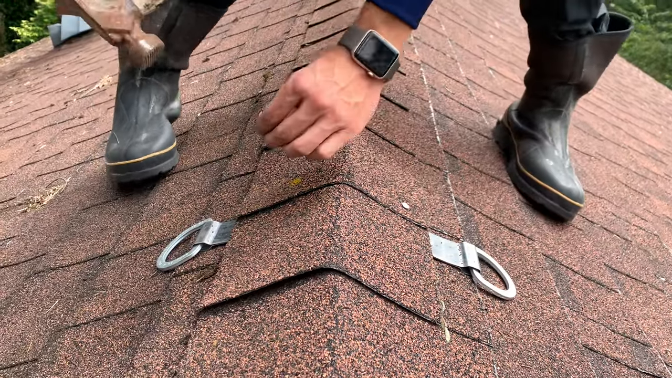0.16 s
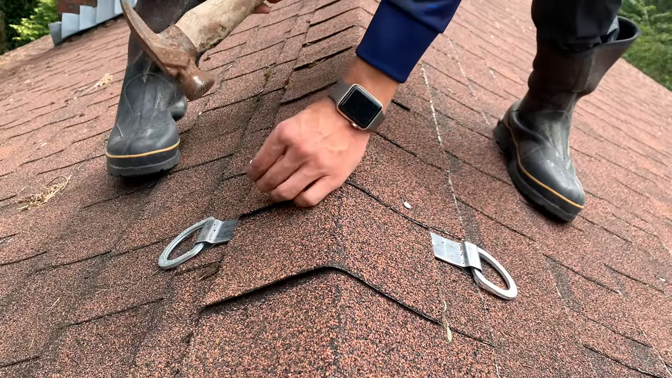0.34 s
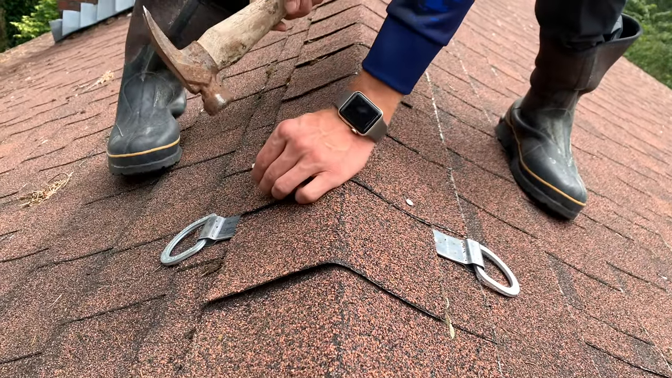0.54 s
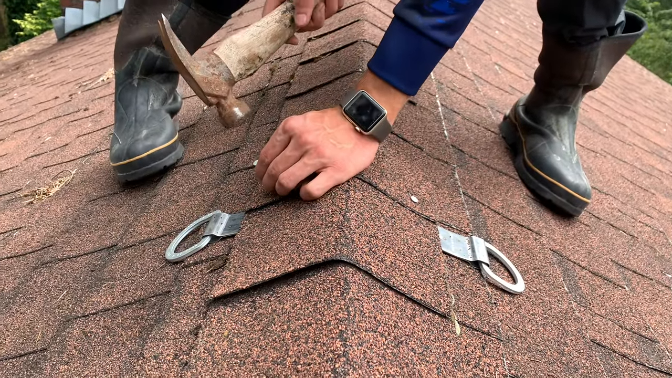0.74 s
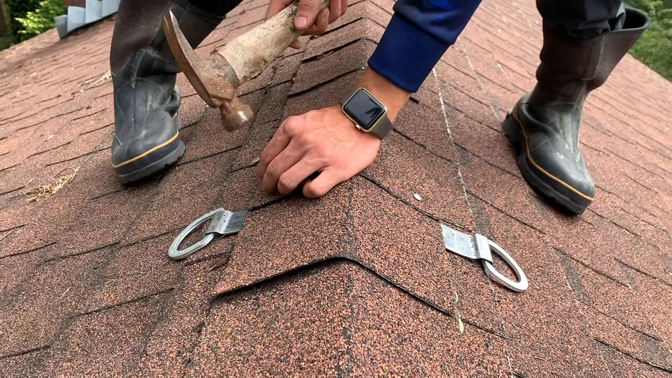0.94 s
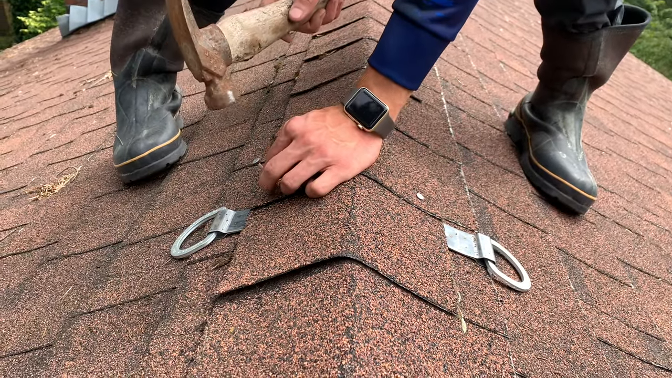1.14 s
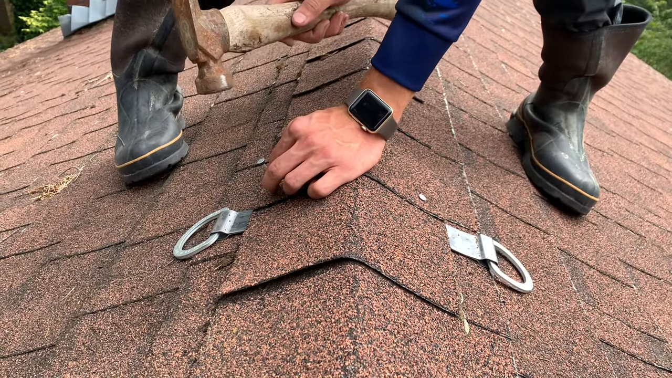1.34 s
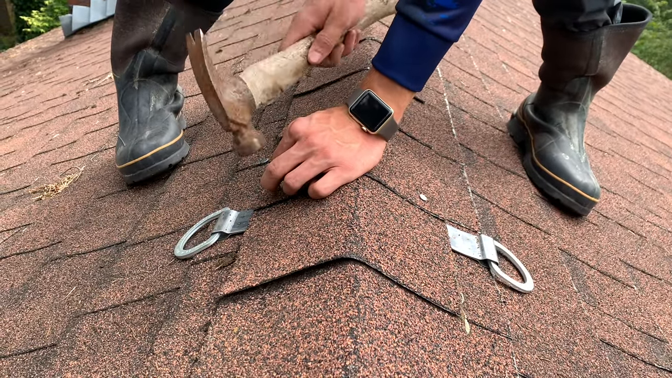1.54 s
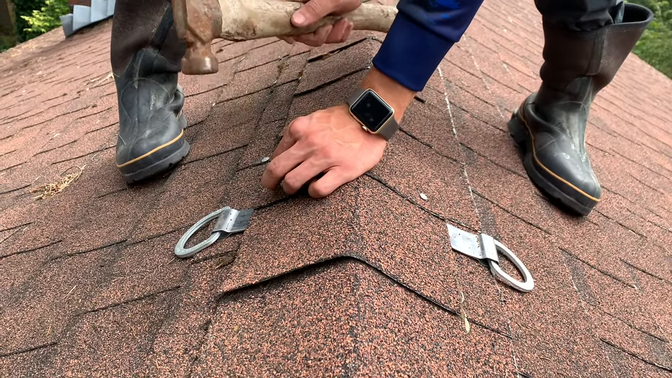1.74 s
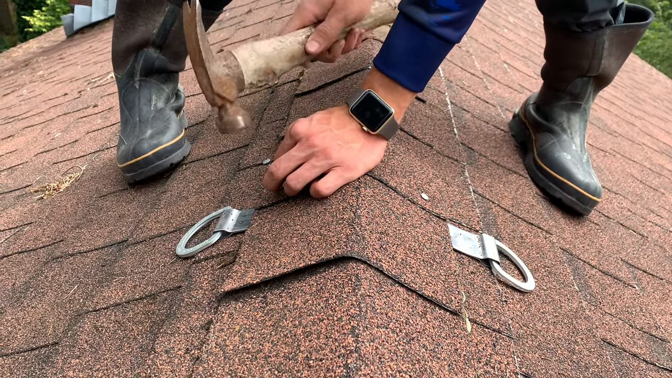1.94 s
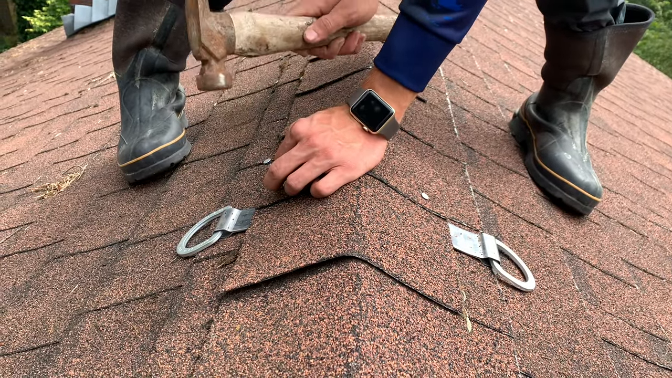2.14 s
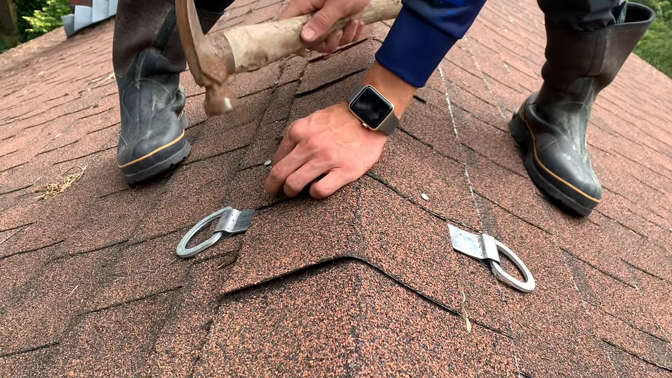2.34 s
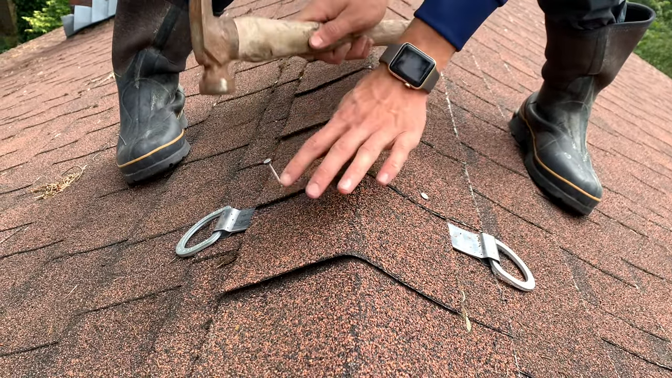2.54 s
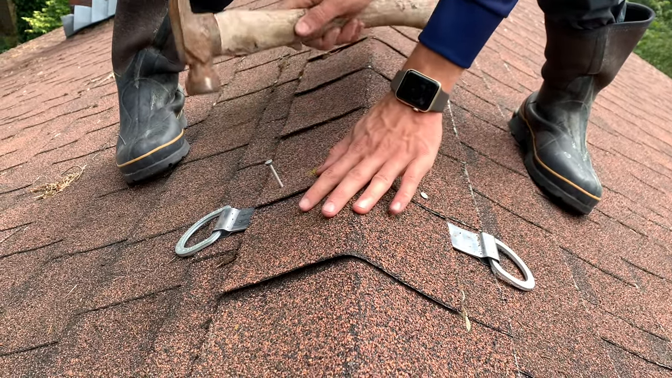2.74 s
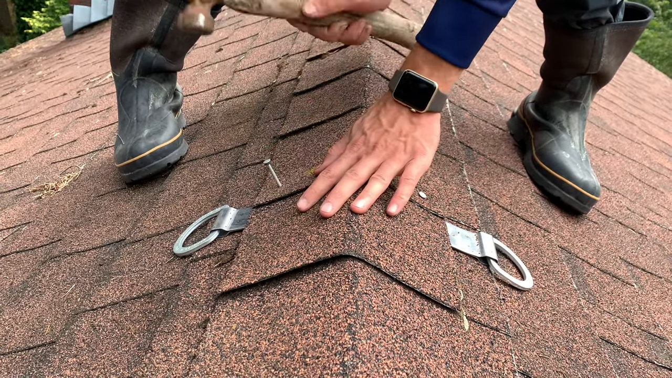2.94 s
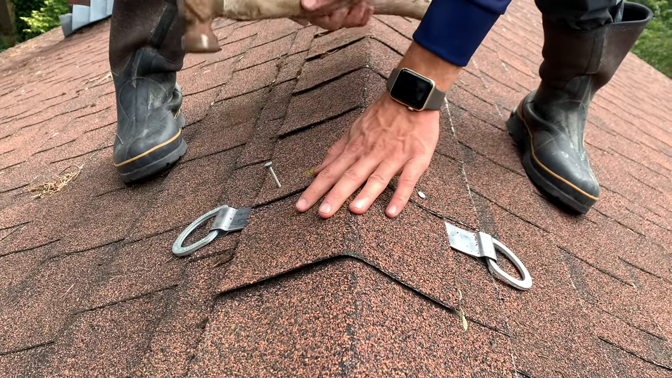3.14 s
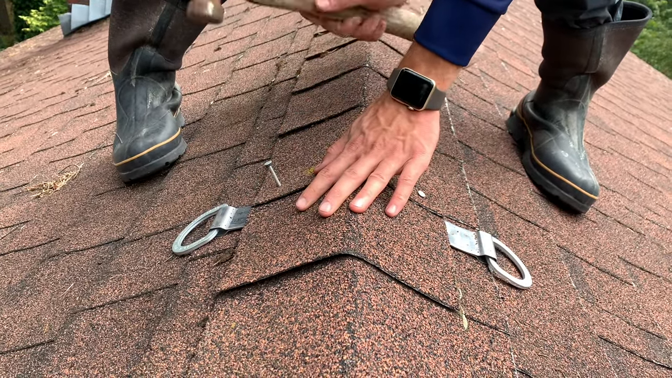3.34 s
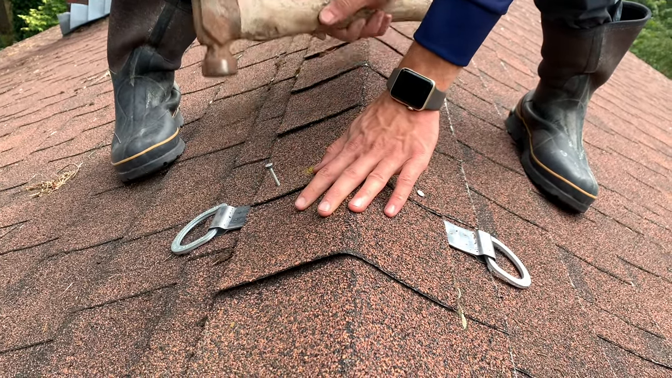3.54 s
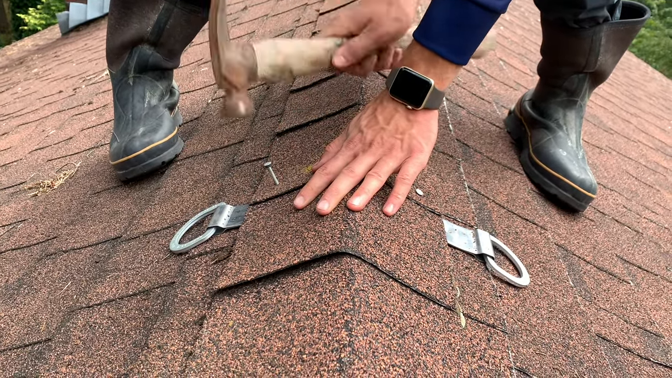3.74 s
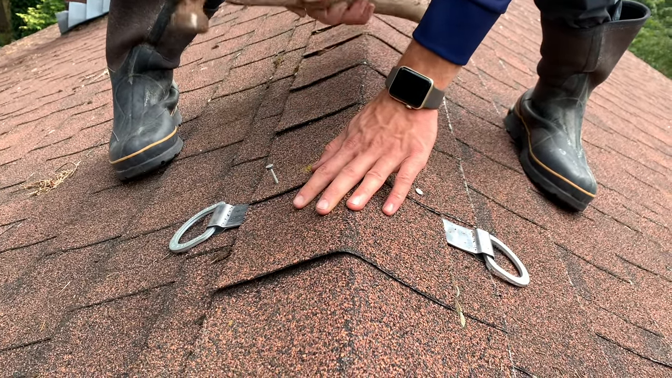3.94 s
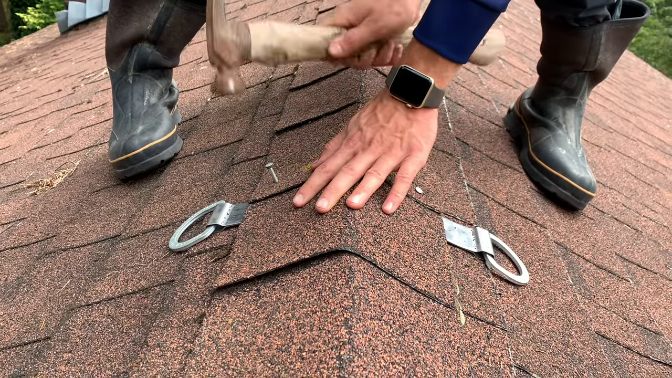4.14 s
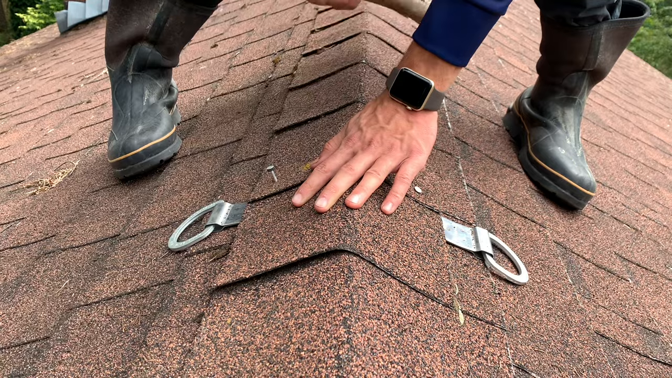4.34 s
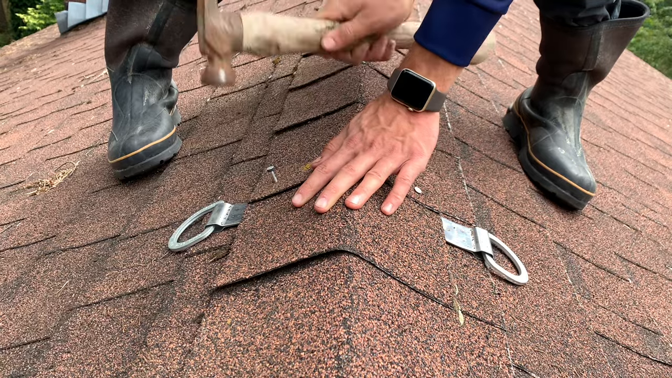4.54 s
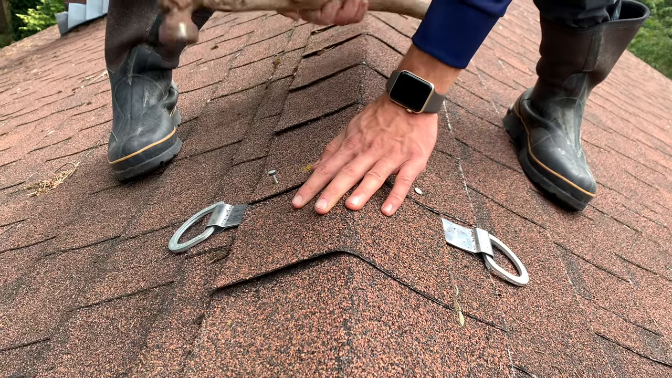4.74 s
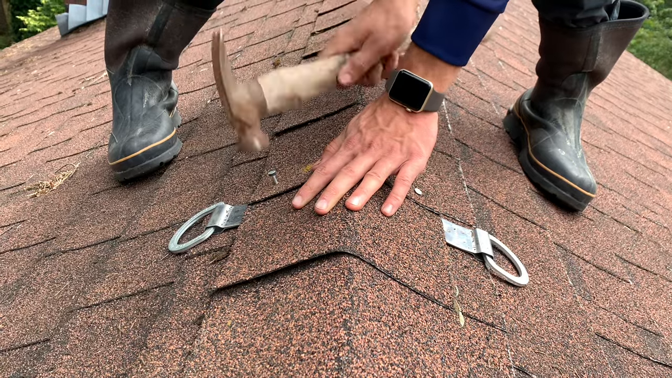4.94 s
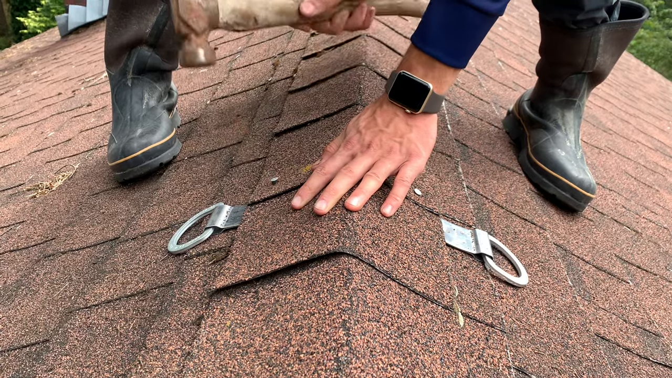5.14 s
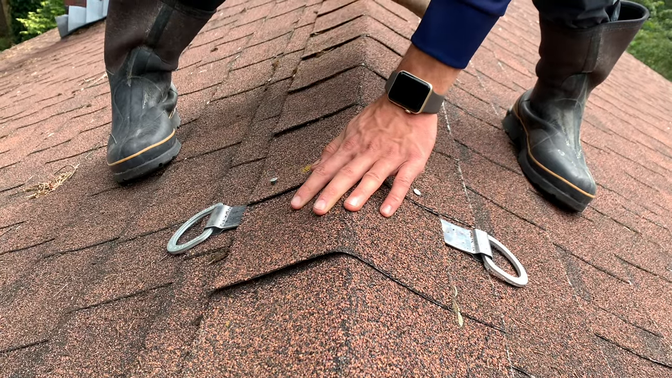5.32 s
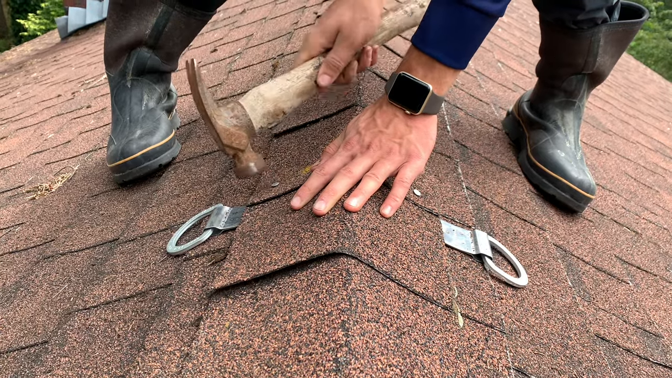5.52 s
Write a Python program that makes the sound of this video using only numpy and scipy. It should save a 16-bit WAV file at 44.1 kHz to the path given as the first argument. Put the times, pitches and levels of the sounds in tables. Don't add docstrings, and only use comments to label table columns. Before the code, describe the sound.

A steel hammer drives a nail through roof shingles in eleven spaced blows, each a sharp crack and hollow wooden knock, after gritty hand scuffs.

```python
import sys
import numpy as np
from scipy import signal
from scipy.fft import rfft, irfft, next_fast_len
from scipy.io import wavfile
from scipy.ndimage import map_coordinates

SR = 44100
rng = np.random.default_rng(int(sys.argv[2]) if len(sys.argv) > 2 else 0)


def volts_from_decibels(level):
    exponent = np.asarray(level, float) / 20
    return 10 ** exponent


def persist_wave(psi):
    counts = np.round(np.clip(psi, -1, 1) * 32767).astype(np.int16)
    wavfile.write(sys.argv[1], SR, np.atleast_2d(counts).T)


N = 250513


def rms_one(x):
    return x / np.sqrt(np.mean(x ** 2) + 1e-20)


def at_hz(points, hz, column=1):
    table = np.array(points)
    return np.interp(np.log(hz), np.log(table[:, 0]), table[:, column])


def add(track, s, sound):
    i = max(round(s * SR), 0)
    track[i:i + len(sound)] += sound[:N - i]


def drift(rate):
    knots = rng.standard_normal(800)
    return map_coordinates(knots, [np.arange(N) / SR * rate], order=3)


def ring(x, hz, t60):
    r, w = volts_from_decibels(-60 / (t60 * SR)), 2 * np.pi * hz / SR
    return signal.lfilter([0, np.sin(w)], [1, -2 * r * np.cos(w), r * r], x + 1e-18)


def coloured(x, spectrum):
    size = next_fast_len(len(x) + 2048)
    hz = np.maximum(np.fft.rfftfreq(size, 1 / SR), 1)
    return irfft(rfft(x, size) * volts_from_decibels(at_hz(spectrum, hz)), size)[:len(x)]


def filtered(x, order, hz, kind="low"):
    return signal.sosfilt(signal.butter(order, hz, kind, fs=SR, output="sos"), x)


def swells(rows, rise, fall):
    s, length, level_db = np.transpose(rows)[:, :, None]
    t = np.arange(N) / SR
    ahead, after = np.maximum(s - t, 0), np.maximum(t - s - length, 0)
    return volts_from_decibels(np.max(level_db - rise * ahead - fall * after, axis=0))


# f/Hz, likeness [0..1]
LIKENESS = [(60, 0.98), (130, 0.84), (290, 0.71), (640, 0.46), (1400, 0.05), (6000, 0.046), (15000, 1)]


def noise_bands(low_hz, count):
    edges = low_hz * 2 ** (np.arange(count + 1) / 2)
    white = rng.standard_normal((2, 2, N))
    for k, (low, high) in enumerate(zip(edges, edges[1:])):
        mid, side = filtered(white[k % 2], 2, [low, high], "band")
        hz = np.sqrt(low * high)
        alike = np.clip(at_hz(LIKENESS, hz), 0, 1)
        yield hz, np.sqrt(1 + alike) * mid + np.sqrt(1 - alike) * side * [[1], [-1]]


# f/Hz, level/dB
AIR = [(15, -43.5), (30, -25.5), (60, -0.5), (108, 0), (249, -9.5), (560, -15.5), (960, -19.5), (1840, -28),
       (3000, -26), (4200, -28.5), (7000, -37), (11900, -49.5), (16000, -62)]
# t/s, length/s, level/dB
WIND = [
    (0, 0.0099, -33.5),
    (.18, 0.026, -44),
    (.56, .04, -54),
    (1.09, 0.33, -55),
]


def air():
    hum = sum(volts_from_decibels(at_hz(AIR, hz) + 1.5 * drift(9)) * band for hz, band in noise_bands(24, count=19))
    wind = sum(volts_from_decibels(1.7 * drift(22)) * band for hz, band in noise_bands(24, count=4))
    return volts_from_decibels(-51.5) * rms_one(hum) + swells(WIND, rise=153, fall=123) * rms_one(wind)


# t/s, length/s, level/dB
INSECTS = [
    (3.2, .1, -70),
    (3.5, .8, -76),
    (4.5, .5, -63),
    (5.2, .2, -74),
]


def insects():
    hiss = rng.standard_normal((2, N))
    for _ in range(2):
        hiss = ring(hiss, hz=5350, t60=.0016)
    return swells(INSECTS, rise=50, fall=50) * volts_from_decibels(2.5 * drift(25)) * rms_one(hiss)


# t/s, length/s, first f/Hz, held f/Hz, level/dB
BIRDS = [(2.72, 0.51, 3640, 3930, -60.5), (5.182, 0.29, 3570, 4083, -56.5), (2.028, 0.083, 2500, 2370, -60),
         (2.135, 0.073, 2060, 2070, -68), (3.195, 0.27, 2230, 2200, -70.5), (3.292, 0.25, 3370, 3510, -65),
         (3.682, 0.038, 4600, 4530, -60), (3.92, .26, 3630, 3710, -65), (4.002, 0.23, 3760, 4650, -66),
         (4.038, .16, 3810, 4120, -64.5), (4.08, .12, 4000, 4420, -64), (4.122, .09, 4500, 4900, -69),
         (3.226, 0.041, 4420, 4400, -68), (3.99, 0.2, 2110, 2290, -68.5), (4.353, 0.063, 2220, 2370, -68),
         (5.222, 0.2, 2180, 2310, -68.5), (5.32, 0.041, 4600, 4740, -58), (2.801, 0.18, 3150, 3010, -70),
         (5.33, .18, 2950, 3060, -71)]


def birds():
    slide_hz_per_s, sag_db_per_s = 5000, 25
    woods_t60_s, woods_db = .4, -2
    out, t = np.zeros((2, N)), np.arange(N) / SR
    for s, length, first_hz, held_hz, level_db in BIRDS:
        fade = np.clip(np.minimum(t - s, s + length - t) / 0.0067, 0, 1)
        slide_s = .001 + abs(held_hz - first_hz) / slide_hz_per_s
        hz = np.interp(t, [s, s + slide_s], [first_hz, held_hz])
        phase = 2 * np.pi * np.cumsum(hz * (1 + .007 * drift(65))) / SR
        flutter_db = 4.5 * np.array([drift(50), drift(50)])
        level = fade * volts_from_decibels(level_db - sag_db_per_s * (t - s) + flutter_db)
        out += level * np.sin(phase + rng.uniform(0, 1.8, (2, 1)))
    tail = rng.standard_normal((2, 8000)) * volts_from_decibels(-60 * t[:8000] / woods_t60_s)
    tail = tail / np.sqrt(np.sum(tail[0] ** 2))
    return .55 * out + volts_from_decibels(woods_db) * signal.fftconvolve(out, tail, axes=1)[:, :N]


# f/Hz, level/dB per Hz, t60/s
ATTIC = [(30.6, -6, 1.1), (59, -3, 0.94), (115, -3.5, 0.67), (215, -28.5, 1.09), (555, -12.5, 0.15),
         (1290, -4, 0.06), (5160, -11.5, 0.034)]


def attic():
    out, boom = 0, np.zeros(N)
    for s, *_, boom_db, ring_db in BLOWS:
        add(boom, s, volts_from_decibels([boom_db]))
    for hz, band in noise_bands(28.77, count=16):
        fall = volts_from_decibels(-60 / (at_hz(ATTIC, hz, column=2) * SR))
        swell = np.exp(-hz / (3.0 * SR))
        decay = signal.lfilter([1], [1, -fall], boom + 1e-18)
        shape = signal.lfilter([1 - swell], [1, -swell], decay)
        out = out + volts_from_decibels(at_hz(ATTIC, hz) + 12) * shape * band
    return out


# f/Hz, level/dB per Hz
SCRAPE = [(1000, -20), (2300, 0), (4500, -6), (8800, 0), (13300, -6), (14200, -45)]


def scrape():
    hiss = np.array([coloured(white, SCRAPE) for white in rng.standard_normal((2, N))])
    return volts_from_decibels(0.5 + 3.0 * drift(30)) * swells(RUBBING, rise=113.5, fall=34.5) * rms_one(hiss)


# f/Hz, level/dB per Hz
GRIT = [(470, -57.5), (900, -4.5), (1420, 7), (2410, 12), (5110, 12.5), (8990, 12.5), (13100, -1),
        (15500, -32)]


def grains(per_s, spread_db, clump_db):
    sizes = volts_from_decibels(spread_db * np.minimum(rng.exponential(1, N), 4)) * rng.choice([-1, 1], N)
    clicks = sizes * (rng.random(N) < per_s * volts_from_decibels(clump_db * drift(110)) / SR)
    dealt = rng.integers(0, 10, N)
    out = 0
    for k, hz in enumerate(np.geomspace(1100, 11500, 10)):
        out = out + volts_from_decibels(at_hz(GRIT, hz)) * np.sqrt(hz) * ring(clicks * (dealt == k), hz, 4 / hz)
    return rms_one(out)


# t/s, length/s, level/dB
RUBBING = [
    (.03, 0.075, -57.5),
    (.18, .1, -67),
    (.36, 0.14, -75.5),
    (.8, .17, -63),
    (1.13, .14, -61.5),
    (2.39, .18, -66),
    (3.5, .17, -64.5),
    (5.19, .03, -78),
    (5.6, .08, -76),
]


def rubbing():
    return volts_from_decibels(8) * swells(RUBBING, rise=113.5, fall=128) * grains(per_s=700, spread_db=5, clump_db=10)


def thrown_db(ring_db):
    usual_ring_db = -67
    return usual_ring_db + 14 + .45 * (ring_db - usual_ring_db)


LANDS_AFTER_S = [
    .033,
    .054,
]


def landings():
    rows = []
    for (s, *_, ring_db), c in zip(BLOWS, rng.standard_normal((len(BLOWS), 4))):
        for k, wait in enumerate(LANDS_AFTER_S):
            peak_db = thrown_db(ring_db) + 15 + 3 * c[2 + k]
            rows.append((s + wait * (1 + c[k] / 12), peak_db, 1300))
    return rows


# t/s, peak level/dB, f/Hz
SCUFFS = [(0.054, -39, 8400), (0.0716, -35.5, 1490), (0.1093, -24, 2640), (0.242, -48, 4700),
          (0.2747, -31.5, 4760), (0.3588, -30, 10300), (0.398, -39.5, 1380), (0.4327, -40.5, 8600),
          (0.4914, -35.5, 9900), (0.5334, -40, 9600), (0.6335, -35, 3800), (0.729, -42, 4020),
          (0.7995, -47, 1510), (0.8137, -21.5, 4300), (0.856, -42, 1420), (0.8915, -43, 2480),
          (0.9196, -26, 9900), (0.9643, -20.5, 4450), (1.0036, -31.5, 2460), (1.037, -39, 1450),
          (1.096, -38, 1460), (1.122, -29.5, 2050), (1.151, -23.5, 2770), (1.1963, -25, 2200),
          (1.223, -31, 1740), (1.2557, -33, 2200), (1.272, -27, 2480), (1.3003, -50, 2450),
          (1.336, -43, 3980), (1.423, -28.5, 1760)]
# t/s, peak level/dB, f/Hz
SHUFFLES = [(1.5658, -25, 1200), (1.666, -42, 4060), (1.7915, -34, 2460), (2.0155, -41, 2480),
            (2.1733, -44, 7400), (2.234, -37, 3970), (2.4174, -53, 1500), (2.443, -39, 2520),
            (2.4824, -35, 8100), (2.5404, -26, 2460), (2.5736, -28.5, 2400), (2.596, -33, 8400),
            (2.7026, -28.5, 1300), (3.21, -44, 2184), (3.4194, -42, 2860), (3.4355, -36, 2180),
            (3.551, -37, 1670), (3.571, -27, 2420), (3.6082, -34, 1380), (3.6287, -28, 2570),
            (3.682, -27.5, 2560), (3.6994, -31, 2560), (4.6874, -35, 1830), (4.6961, -28, 1360),
            (4.434, -45, 8000), (3.769, -54, 8500), (4.828, -40, 10800), (4.8677, -46, 1320),
            (5.0772, -27.5, 1320)]


def scuffs():
    out, rows = np.zeros((2, N)), SCUFFS + SHUFFLES + landings()
    noise, t = rng.standard_normal((len(rows), 600)), np.arange(600) / SR
    for (s, peak_db, hz), grain in zip(rows, noise):
        pan_db = 4.5 + 2.0 * grain[-1]
        crunch = grain * np.abs(grain) * np.exp(-t / .0018)
        blunt = ring(crunch, hz, 6 / hz)
        crunch = rms_one(blunt) + 0.77 * rms_one(coloured(crunch, GRIT))
        crunch *= volts_from_decibels(peak_db - 2) / np.abs(crunch).max()
        add(out[0], s, crunch * volts_from_decibels(pan_db / 2))
        add(out[1], s, crunch * volts_from_decibels(-pan_db / 2))
    return out


# t/ms after the blow, f/Hz, level/dB
DECK_WAVE = [
    (0, 238, 1),
    (6, 197, 8.5),
    (11, 160, -1),
    (16, 172, -1),
    (21, 85, 7),
    (28, 72, 8.5),
    (43, 56, 1.5),
    (66, 46, -11),
    (110, 44, -47),
]
ZONES_MS = [
    15,
    21,
]


def deck_wave(thud_db, boom_db):
    ms = np.arange(round(.11 * SR)) / SR * 1000
    when, hz, level_db = np.transpose(DECK_WAVE)
    strength_db = np.interp(ms, ZONES_MS, [thud_db, boom_db])
    wave = np.sin(2 * np.pi * np.cumsum(np.interp(ms, when, hz)) / SR)
    return volts_from_decibels(np.interp(ms, when, level_db) + strength_db) * wave


# f/Hz, level/dB, t60/s
KNOCK = [
    (575, -2.5, 0.019),
    (648.4, 5.5, 0.023),
    (913, 0.5, 0.013),
    (1106, -0.5, 0.02),
    (1933, -7, 0.005),
]


def knock(chance, tilt_db):
    push = np.zeros(2048)
    add(push, 0, [.6])
    add(push, .0024 * (1 + chance[0] / 10), [1.2])
    sound = 0
    for (hz, level_db, t60), c in zip(KNOCK, chance):
        mode_db = level_db + 1.2 * c + tilt_db * np.log2(hz / 700)
        sound = sound + volts_from_decibels(mode_db) * ring(push, hz * (1 + c / 40), t60)
    return sound / np.sqrt(np.mean(sound[:round(.006 * SR)] ** 2))


# f/Hz, level/dB
CRACK = [(300, -31), (800, -3.5), (2000, -5), (3000, -6.5), (4300, -1.5), (6500, -7.5), (10000, -12.5),
         (16000, -25)]


def crack(noise, nail_hz, nail_db):
    t = np.arange(len(noise)) / SR
    contact = np.exp(-(t / .0024) ** 2) + volts_from_decibels(-17) * np.exp(-t / .006)
    chatter = noise * np.minimum(t / .0003, 1) * contact
    nail = rms_one(ring(chatter, nail_hz, 0.019))
    sound = rms_one(coloured(chatter, CRACK)) + volts_from_decibels(nail_db) * nail
    return sound / np.sqrt(np.mean(sound[:round(.004 * SR)] ** 2))


# knock level/dB, f/Hz
NAIL = [
    (-28, 4300),
    (-18.5, 4200),
    (-10, 1754),
]


def strike(grain, s, knock_db, lag_ms):
    firm = knock_db + 12
    nail_hz = np.interp(knock_db, *np.transpose(NAIL))
    crack_db, seating_db = -19.5 - 0.33 * firm, 2.5 + 0.49 * firm
    tilt_db = -2.5 + 7.5 * max(s - 3.9, 0)
    hollow = [(1100, 0), (2200, 0.94 * firm), (3520, 0)]
    hit = volts_from_decibels(crack_db + 4.5) * coloured(crack(grain, nail_hz, nail_db=-11.5), hollow)
    late = round((0.00039 + .5 * max(lag_ms, 0) / 1000) * SR)
    hit[late:] += volts_from_decibels(knock_db + seating_db) * knock(grain[-5:], tilt_db)[:len(hit) - late]
    return hit


# t/s, knock level/dB, thud level/dB, boom level/dB, hammer ring level/dB
BLOWS = [(1.555, -23.2, -35.1, -27.8, -82), (1.9137, -21.8, -18.1, -22.0, -78),
         (2.2625, -18.0, -15.1, -21.0, -80), (2.6605, -20.4, -16.5, -24.3, -70),
         (3.0644, -15.8, -15.9, -23.8, -80.5), (3.4643, -13.0, -11.6, -19.0, -57.5),
         (3.8386, -12.3, -11.6, -18.5, -65), (4.228, -11.0, -10.8, -19.3, -58.5),
         (4.6317, -10.6, -10.0, -17.8, -51), (5.0287, -12.5, -14.9, -23.3, -65.5),
         (5.5443, -12.8, -17.8, -20.2, -77)]
# f/Hz, level/dB, t60/s
HAMMER = [
    (4690, -1, .22),
    (5978, -4, .2),
    (9507, -2, .13),
    (12200, -13, .3),
    (12512, 2, .12),
    (14870, -7, .12),
]


def blows():
    echo_s, wave_lag_s = .1115, .0019
    out, echo, steel, jumps = np.zeros((4, N))
    noise, t = rng.standard_normal((len(BLOWS), 2048)), np.arange(4000) / SR
    for (s, knock_db, thud_db, boom_db, ring_db), grain in zip(BLOWS, noise):
        lag_ms = -.1 * (knock_db + 12) - .12 * (thud_db + 12)
        hit = strike(grain, s, knock_db, lag_ms)
        wave = deck_wave(thud_db, boom_db)
        far = volts_from_decibels(-22.5 + 0.32 * (knock_db + 12))
        add(out, s - .0003, hit)
        add(out, s + lag_ms / 1000 + wave_lag_s, wave)
        add(echo, s + echo_s, far * hit)
        add(echo, s + echo_s + wave_lag_s, far * wave)
        add(steel, s, volts_from_decibels([ring_db]))
        add(jumps, s, volts_from_decibels(thrown_db(ring_db)) * np.exp(-t / 0.033))
    for hz, level_db, t60 in HAMMER:
        out += volts_from_decibels(level_db + 14) * ring(steel * volts_from_decibels(rng.normal(0, 3, N)), hz, t60)
    thrown = jumps * grains(per_s=410, spread_db=-2.0, clump_db=4.0)
    out += volts_from_decibels(8.5) * filtered(thrown, 2, 9900)
    dull_echo = volts_from_decibels(-2.0) * filtered(echo, 1, [200, 600], "band")
    bright_echo = volts_from_decibels(-14.5) * filtered(echo, 2, [1500, 7000], "band")
    return out + dull_echo + bright_echo


# f/Hz, level/dB
PORT_DB = [(60, 3.0), (110, 2.5), (200, 1.0), (380, 1.5), (700, 2.5), (1290, 1.0), (2380, 0.5), (4400, 2.0),
           (8120, 2.0), (15000, 0.0)]
# f/Hz, phase/rad
PORT_PHASE = [(0, 0), (1210, 0.1), (1550, -0.2), (1890, 0.5), (2930, -1.4), (3700, -0.9), (4130, -0.3),
              (4480, -0.5), (5940, -5.6), (7670, -5.6), (8870, -6.5), (12800, -6.7), (15500, -7.3),
              (16500, -6.6)]


def ports(near):
    size = next_fast_len(N)
    hz = np.maximum(np.fft.rfftfreq(size, 1 / SR), 1)
    half = volts_from_decibels(at_hz(PORT_DB, hz) / 2)
    turn = np.exp(1j * np.interp(hz, *np.transpose(PORT_PHASE)))
    delay = np.exp(-2j * np.pi * hz * .0007)
    echo = volts_from_decibels(-10.5) * delay * hz / (hz + 450)
    sides = np.array([half * turn * (1 - echo), (1 + echo) / half])
    return irfft(rfft(near, size) * sides, size)[:, :N]


def smear():
    start_db, db_per_ms, length = -23, 2.0, 1300
    rise, tones = np.zeros((2, N))
    ms_ahead = np.arange(length, 0, -1) / SR * 1000
    for (s, *_), hz in zip(BLOWS, rng.uniform(3300, 7200, (len(BLOWS), 5, 1))):
        add(rise, s - length / SR, volts_from_decibels(start_db - db_per_ms * ms_ahead))
        lines = np.sin(2 * np.pi * hz * ms_ahead / 1000).sum(axis=0)
        add(tones, s - length / SR, volts_from_decibels(start_db - 10 - 0.99 * db_per_ms * ms_ahead) * lines)
    band = signal.cheby2(8, 40, [300, 7700], "band", fs=SR, output="sos")
    hiss = rise * signal.sosfilt(band, rng.standard_normal((2, N)))
    return (hiss + tones) * volts_from_decibels([[4.5], [-2.5]])


def scene():
    background = air() + insects() + birds() + attic()
    grit = scrape() + filtered(scuffs(), 6, 13800)
    near = blows() + filtered(rubbing(), 6, 13800)
    return background + grit + ports(near)


def band_limit(x):
    return signal.sosfilt(signal.butter(12, 16860, fs=SR, output="sos"), x)


def record(dry):
    rounded = dry / (1 + np.abs(dry / .93) ** 5) ** .2
    top_cut = signal.cheby2(10, 60, 17000, fs=SR, output="sos")
    x = signal.sosfilt(top_cut, rounded + smear())
    x = filtered(x, 1, 30, "high")
    return band_limit(x)


dry = scene()
out = record(dry)
persist_wave(out)
```